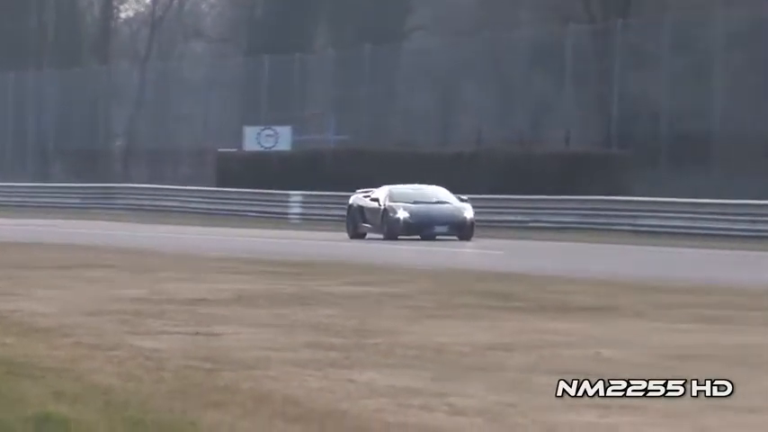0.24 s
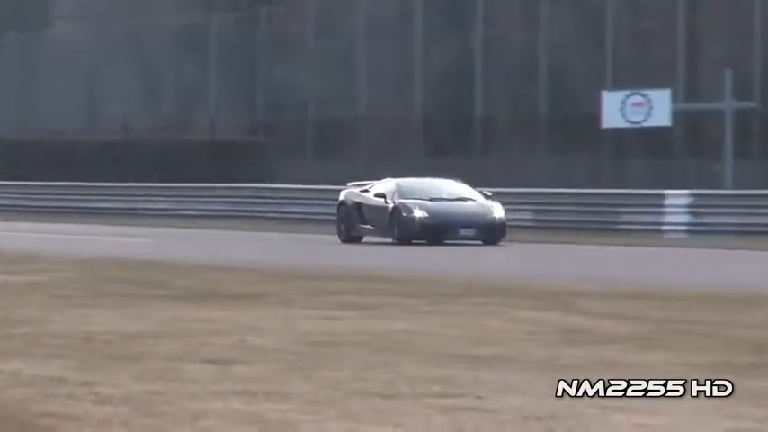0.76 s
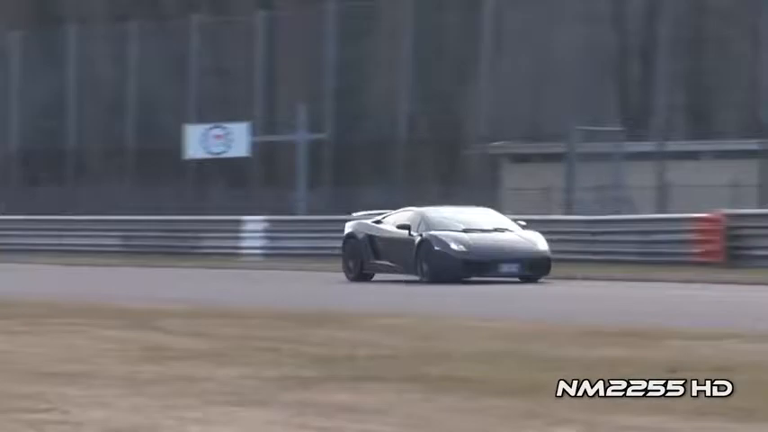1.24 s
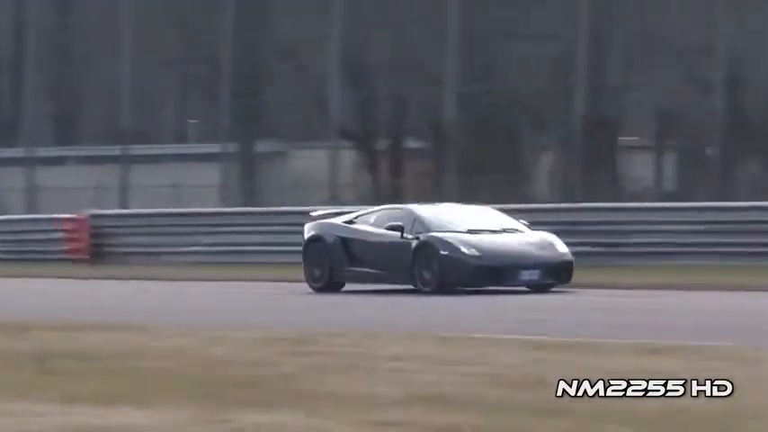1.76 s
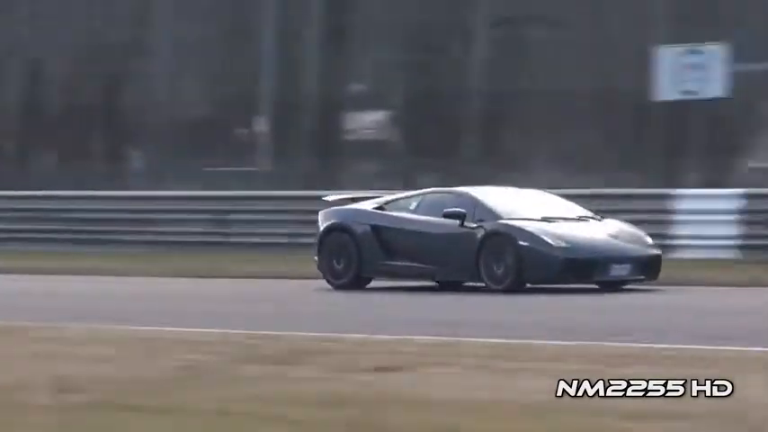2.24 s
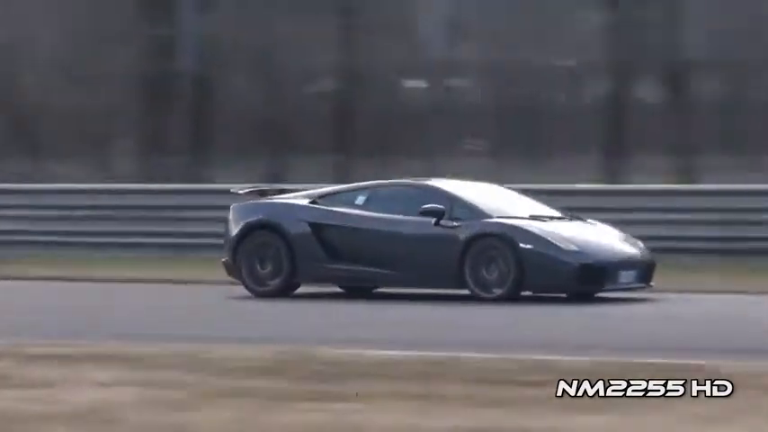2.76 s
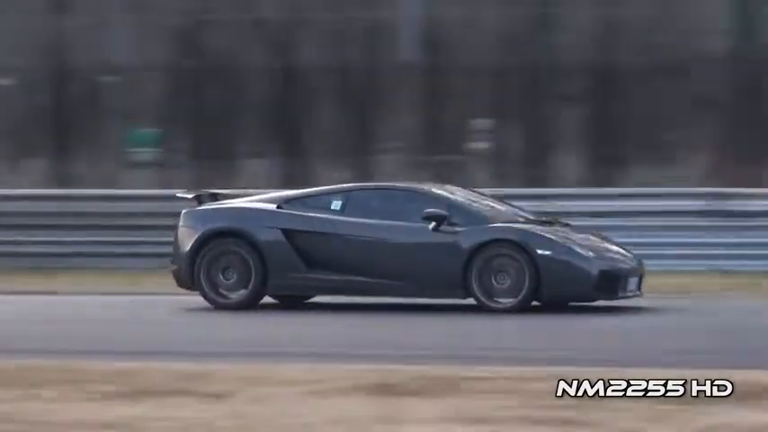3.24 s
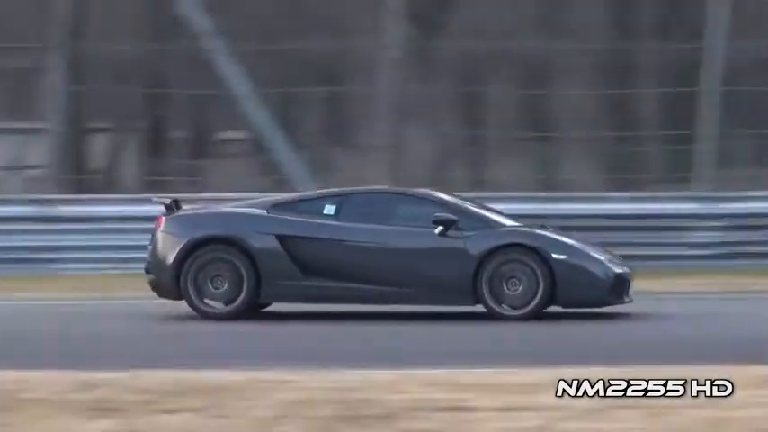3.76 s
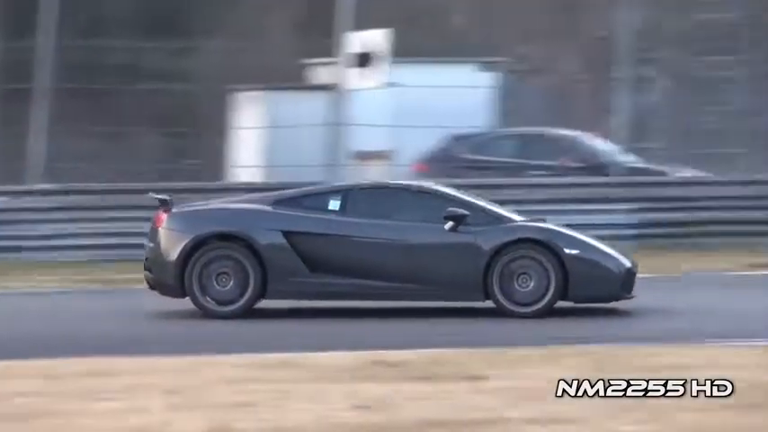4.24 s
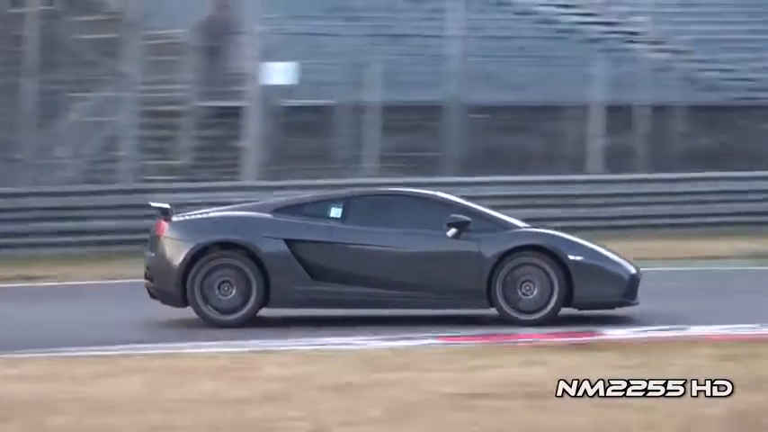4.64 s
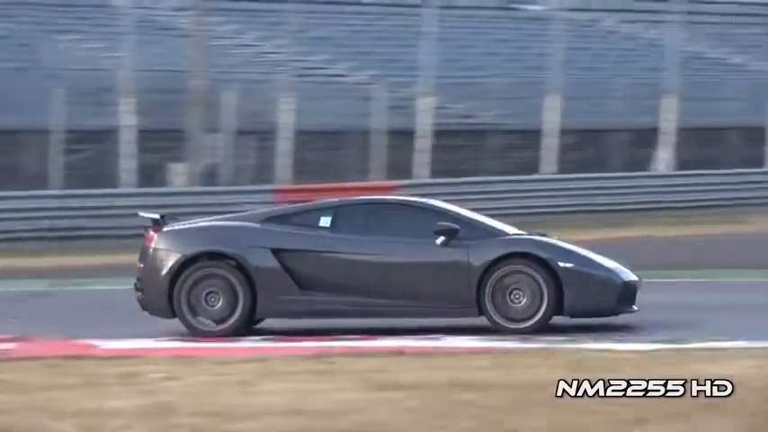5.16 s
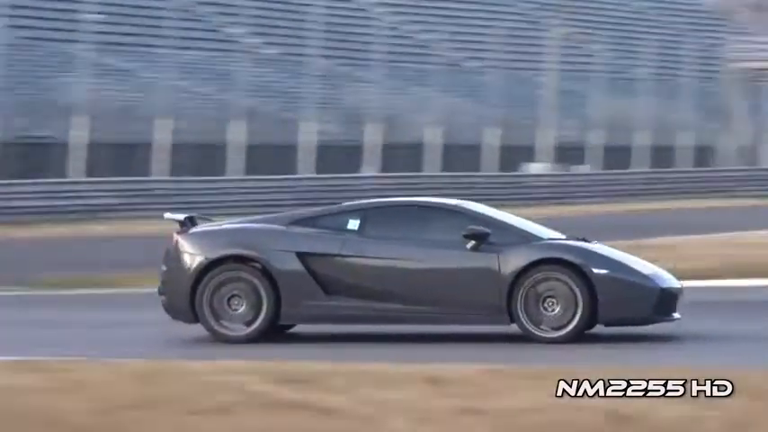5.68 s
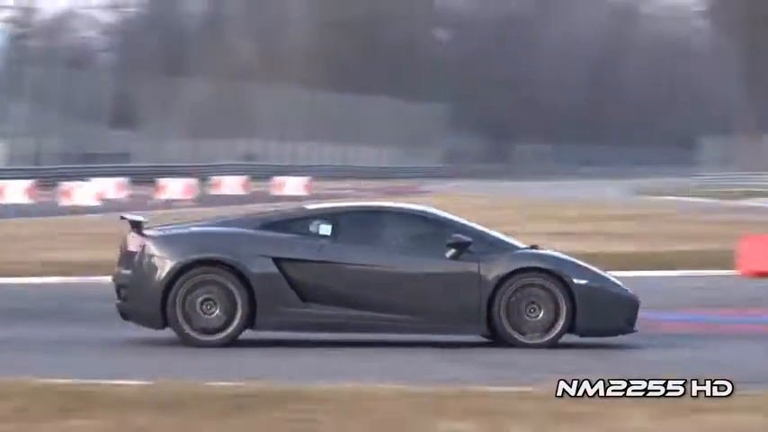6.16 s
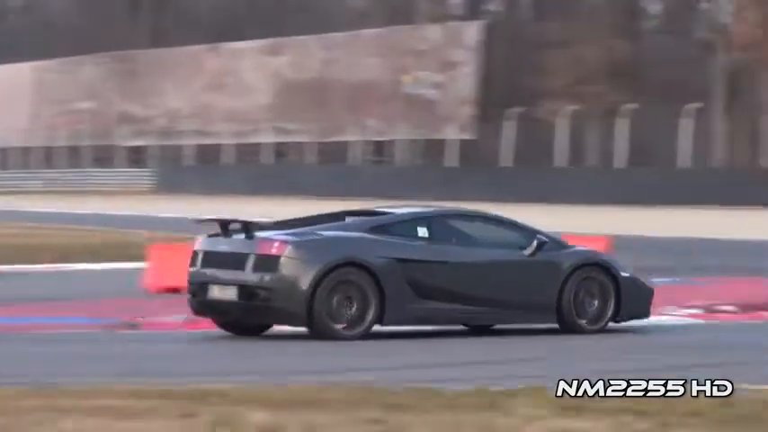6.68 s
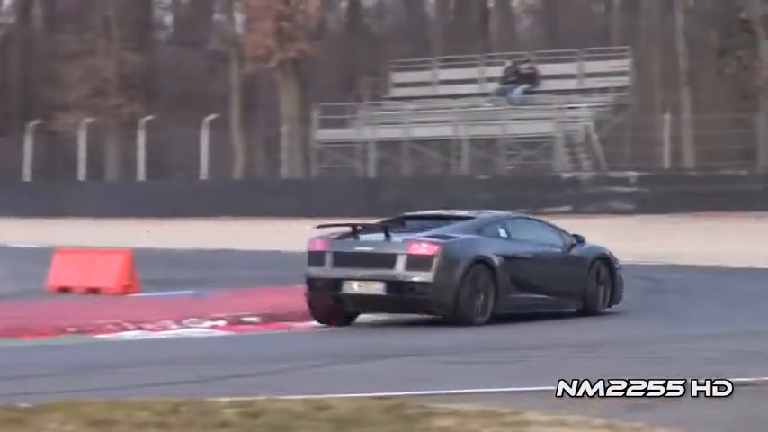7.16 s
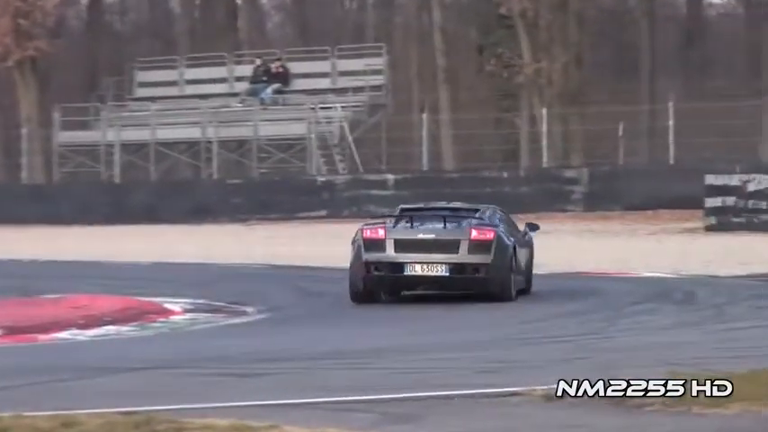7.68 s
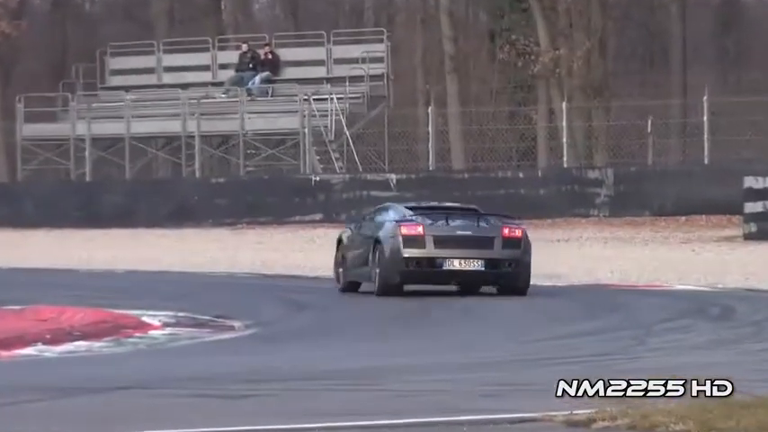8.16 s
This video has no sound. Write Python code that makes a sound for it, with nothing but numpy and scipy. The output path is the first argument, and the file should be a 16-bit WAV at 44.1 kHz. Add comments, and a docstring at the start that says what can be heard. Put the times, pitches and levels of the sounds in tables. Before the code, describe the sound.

A trackside microphone with muffled treble follows one powerful car braking for a chicane. Far-off whine and rushing roar come first, a throttle blip with a wall echo, a long fall in pitch, then a second, sharper crackling blip. The engine sinks to a hollow lumpy hum as it rolls by, with small pops, thumps and wind. After short tyre chirps, the throttle opens and the exhaust swells loudly.

```python
"""A falling engine note is heard first, under tyre and gas roar: a ten-cylinder sports car brakes for a
chicane with two throttle blips, rolls past, brushes the kerbs and opens the throttle on the way out.
The engine is a sum of orders (multiples of its cycle rate) weighted by resonant pipe modes; roar, rumble
and wind are noise with shaped spectra; cracks and chirps are ringing noise bursts; barriers reflect the car."""
import sys
import numpy as np
from scipy import signal
from scipy.fft import rfft, irfft, next_fast_len
from scipy.io import wavfile
from scipy.ndimage import uniform_filter1d

SR = 44100
rng = np.random.default_rng(int(sys.argv[2]) if len(sys.argv) > 2 else 0)


def to_wav(s):
    """Save 16-bit WAV."""
    ch = np.atleast_2d(s).T  # columns
    pcm = np.round(np.clip(ch, -1, 1) * 32767)  # PCM
    wavfile.write(sys.argv[1], SR, pcm.astype(np.int16))


N = 371322
T = np.arange(N) / SR
STEP = 32  # samples between control points
CONTROL_T = np.arange(N // STEP + 2) * STEP / SR

# Engine speed on the approach: (time [s], cycle rate [Hz])
APPROACH_SPEED = [(0, 61.26), (.25, 56.4), (.48, 53.87), (.53, 62.34), (.575, 70.5), (.625, 79), (.78, 69),
                  (.95, 62.95), (1.2, 60.7), (1.4, 57.03), (2.08, 47.01), (2.13, 49.45), (2.2, 61.7),
                  (2.24, 69.54), (2.275, 74.6), (2.36, 70.1), (2.5, 60.73)]
# Strongest tones on the approach: (time [s], order 5, one bank [dB], order 10, all cylinders [dB],
# order 7 [dB], order 8 [dB])
APPROACH_TONES = [(0, -63, -45, -64, -55), (.5, -63.5, -44.5, -57, -47.5), (1.3, -58, -53, -41, -41.5),
                  (1.55, -34.5, -42, -59.5, -49.5), (2.0, -36, -36.5, -62, -53), (2.11, -24, -32, -53, -39),
                  (2.2, -43, -47, -46, -42), (2.44, -38.5, -39, -40, -48)]
# Speed and tones past the second downshift: (time [s], cycle rate [Hz], orders 5, 10, 7, 8 [dB each])
CORNER = [(2.6, 59.2, -24, -31, -57, -53), (2.65, 57.84, -26, -36, -41, -49),
          (2.66, 57.25, -20, -52, -45.5, -48), (2.7, 56.33, -28, -34, -49, -59),
          (2.73, 55.34, -30, -28, -48, -44), (2.76, 54.86, -27, -33, -59, -44.5),
          (2.84, 53.33, -26.5, -27.5, -58.5, -51), (3.01, 50.9, -20.5, -27, -58, -58),
          (3.05, 49.38, -24, -25.5, -43, -57), (3.2, 47.33, -19.5, -24, -54, -53),
          (3.23, 46.73, -23.5, -26, -41, -56), (3.3, 45.2, -25.5, -24.5, -48, -46),
          (3.34, 44.63, -27, -23, -46.5, -37.5), (3.39, 44.34, -23.5, -28, -42, -57),
          (3.44, 43.2, -27, -33, -42.5, -39.5), (3.48, 42.98, -28.5, -41, -42, -56),
          (3.55, 42.13, -28, -36.5, -32.5, -61.5), (3.57, 42.02, -28.5, -36.5, -35, -36.5),
          (3.72, 39.8, -32.5, -38.5, -36, -58), (4.04, 37.32, -37, -40, -27, -41),
          (4.25, 35.13, -41, -36.5, -30, -38), (4.45, 33.5, -40, -34, -27, -25.5),
          (4.8, 32.3, -43, -37, -30, -22.5), (4.95, 31.34, -43, -31, -29, -20),
          (5.01, 32.06, -47, -25.5, -23.5, -25.5), (5.18, 31.04, -51, -31.5, -34, -20.5),
          (5.27, 31.2, -48, -40.5, -26.5, -27), (5.31, 31.24, -49, -34, -35, -22),
          (5.47, 30.78, -52, -30, -28, -20), (5.56, 31.45, -52, -24.5, -28, -15.5),
          (5.83, 32.2, -44, -17.5, -27.5, -16), (5.89, 32.87, -46.5, -17.5, -26, -16.5),
          (6.04, 32.26, -46.5, -25, -28.5, -15.5), (6.26, 32.54, -51, -32, -32, -19.5),
          (6.34, 32.38, -45, -29, -34, -33), (6.46, 31.36, -45, -31.5, -34, -24),
          (6.59, 32.3, -47.5, -26, -32, -29), (6.63, 32.31, -46, -30, -30, -17.5),
          (6.76, 31.2, -51, -23.5, -32, -18), (6.84, 31.42, -52, -26, -37, -17.5),
          (6.89, 31.18, -52, -28, -37, -22), (6.93, 31.38, -56, -21, -35, -24.5),
          (6.99, 31.4, -52, -34, -47, -19.5), (7.05, 31.24, -52, -24.5, -40, -28),
          (7.1, 31.3, -53, -27, -38, -27.5), (7.149, 31.4, -57, -40, -45, -23),
          (7.21, 31.18, -49, -35, -40, -29), (7.24, 31.13, -45, -35, -41.5, -42),
          (7.33, 30.64, -50, -44.5, -43, -36), (7.38, 30.76, -50, -37, -44.5, -37),
          (7.43, 30.7, -51, -30.5, -36.5, -31.5), (7.57, 30.53, -56.5, -34, -34, -29),
          (7.77, 30.52, -55, -24, -28, -24), (7.869, 31.67, -25, -17.5, -25.5, -21),
          (7.93, 32.32, -23.5, -14, -26.5, -30.5), (8.03, 32.3, -32, -12.5, -27.5, -27),
          (8.09, 32.5, -41, -11.5, -30.5, -58), (8.14, 33.75, -35.5, -12.5, -29, -30.5),
          (8.22, 35.48, -37, -12, -32, -23.5), (8.29, 34.84, -22, -14.5, -29, -30.5),
          (8.42, 35.17, -23, -18.5, -36, -24.5)]
ENGINE_SPEED = APPROACH_SPEED + [row[:2] for row in CORNER]
FIRING_TONES = APPROACH_TONES + [(s, *db) for s, _, *db in CORNER]
# Strongest overtones past the second downshift: (time [s], order 18 [dB], order 20 [dB], order 22 [dB])
OVERTONES = [(2.55, -41, -33, -42), (2.74, -42, -29.5, -44), (2.84, -33, -37, -41), (2.93, -28, -40, -36.5),
             (3.07, -20, -43.5, -37), (3.18, -28.5, -41.5, -44), (3.26, -44, -41, -42.5),
             (3.32, -45, -25.5, -44), (3.47, -40, -24.5, -31), (3.62, -37, -28, -44), (3.72, -42, -39, -40),
             (3.95, -43, -46, -35.5), (4.15, -42, -53, -35.5), (4.31, -46.5, -46, -50),
             (5.22, -51, -48.5, -49), (5.3, -52, -39, -50), (5.56, -49.5, -34.5, -46.5),
             (5.87, -49.5, -25.5, -49), (6.07, -48, -32, -47), (6.28, -45, -35, -47), (6.42, -54, -45, -53),
             (6.55, -44, -37, -48), (6.65, -41.5, -25.5, -41.5), (6.86, -49, -26.5, -34.5),
             (7.11, -48, -40, -32), (7.24, -40, -33, -45), (7.38, -39.5, -25, -36.5),
             (7.58, -45, -27.5, -36), (7.74, -51.5, -44.5, -36), (7.84, -48, -29.5, -35),
             (7.91, -28.5, -27, -45), (7.98, -33, -29, -47), (8.05, -27, -20, -47), (8.14, -35, -30.5, -46),
             (8.19, -40, -28, -39), (8.25, -27, -30, -38), (8.42, -46, -31, -46)]
# Orders that change with load: (order, relative level on light throttle [dB],
# change under braking [dB], change at full throttle [dB])
LOAD_ORDERS = [(3.92, 5, 0.8, 4), (6.1, -8.5, 8, 2), (9, -0.5, -1.5, -4), (13, -15, 6.5, 0),
               (14, -14, 7, 4), (15, 2.5, -1, -16), (17, 1.5, 1, 3), (18, 2.5, 6, 4), (19, -8.5, -6.5, 3.5),
               (20, 9.5, 0.6, -0.5), (24, -5.5, 3, 2), (30, -2.5, -1, -6)]
# Orders fed by unevenness between cylinders: (order, relative level [dB])
UNEVEN_ORDERS = [(2, -16.5), (3, -12.5), (11, 5), (12, 3.5), (16, -8.5), (21, -4), (22, -1), (23, -1),
                 (25, -2), (26, 0), (27, -5), (28, -3), (29, -1), (31, 0), (32, -9), (33, -3), (34, 0),
                 (35, -8), (36, -8), (37, -11), (38, -1), (39, -3), (40, -5), (41, -12), (42, -7), (43, -3),
                 (44, -9), (45, -7), (48, -8), (50, -5), (53, -6), (55, -1), (57, -2)]
# Growl at full throttle: (order, depth below the firing tone [dB])
GROWL = [(4, 27), (12, 22), (13, 25), (14, 28), (24, 20), (25, 21), (26, 30), (30, 27.5)]
# Order 12 standing out off the throttle: (time [s], level [dB])
OFF_THROTTLE_12 = [(0, -60), (7.0, -60), (7.2, -39), (7.8, -42), (8.42, -53.5)]
# Low line at a third of the firing tone, heard under braking: (time [s], level [dB])
UNDERTONE = [(0, -54), (2.2, -48), (2.32, -30.5), (2.44, -30.5), (2.55, -41.5), (3.3, -36.5), (3.45, -45),
             (3.6, -37.5), (3.83, -47.5), (3.97, -35.5), (4.1, -52.5), (4.38, -45), (4.55, -60),
             (8.42, -61.5)]
# Lumpiness of combustion: (time [s], factor on the wavering of every order)
LUMPY = [(0, 1), (4.9, 1), (5.05, 1.5), (5.3, .7), (7.0, .7), (7.15, 1.3), (7.7, 1.1), (7.85, .7),
         (8.42, .7)]
# Brief dips in the level of the engine orders: (time [s], depth [dB], half length [s])
DIPS = [(5.065, 10, .024), (5.113, 5, .012), (5.262, 7, .03), (6.36, 6, .03), (6.57, 3, .03)]
# Pipe mode weights as the tail turns: (time [s], low [dB], middle [dB], high [dB], top [dB])
MODE_LEVELS = [(0, -64, -43.5, -36, -45.5), (.4, -58, -41, -27.5, -41), (.68, -69, -37, -41, -31),
               (.9, -32.5, -37, -14.5, -52), (1.03, -43, -35, -30, -51), (1.36, -50.5, -32.5, -38, -55),
               (1.6, -37.5, -33, -23, -35.5), (2.01, -34, -43, -43, -43), (2.12, -18, -49, -32, -29),
               (2.22, -45, -44, -41, -19.5), (2.3, -35, -35, -44, -32.5), (2.45, -30.5, -25, -44, -28.5),
               (2.53, -12, -27, -18, -33), (2.66, -14.5, -24, -34, -31.5), (2.71, -30, -28.5, -20, -28.5),
               (3.05, -23, -18, -14, -25.5), (3.8, -21.5, -26.5, -23, -30), (4.15, -21, -32.5, -23.5, -36),
               (4.5, -27, -40, -43.5, -40), (4.95, -21, -49, -29.5, -44), (5.2, -19, -43, -29, -43.5),
               (5.4, -20, -30.5, -29.5, -41.5), (5.65, -14.5, -31.5, -24.5, -35.5),
               (5.9, -10.5, -28, -22.5, -34.5), (6.2, -21, -20, -27.5, -37), (6.47, -20, -38, -55, -50.5),
               (6.68, -21, -17.5, -24.5, -38.5), (6.9, -16.5, -24, -29, -39),
               (7.04, -24, -27.5, -33.5, -34.5), (7.2, -25, -27.5, -22, -42), (7.3, -34, -25, -27, -42),
               (7.42, -21.5, -18, -22.5, -40), (7.52, -24.5, -21, -15.5, -32), (7.62, -26, -22, -19.5, -44),
               (7.74, -26.5, -36.5, -21.5, -31.5), (7.84, -13.5, -23, -22, -31.5),
               (7.93, -10.5, -19.5, -14, -29), (8.04, -11, -15, -17, -37.5), (8.14, -18, -28, -27, -31),
               (8.22, -16, -16, -20.5, -24.5), (8.42, -16, -35.5, -16.5, -28.5)]
# Fixed mode settings: low (frequency [Hz], width [Hz]), high width [Hz], top (frequency [Hz], width [Hz])
FIXED_MODES = [(251, 75), 48, (1590, 1070)]
# Modes that shift as the tail turns: (time [s], middle [Hz], middle width [Hz], high [Hz])
MOVING_MODES = [(0, 682, 84.5, 885), (5.2, 664, 83, 871), (5.9, 648.6, 89.78, 900.5),
                (6.65, 621.7, 70.67, 941), (6.85, 659.5, 89.9, 925.7), (7.05, 686, 89.5, 905),
                (7.2, 620, 119.7, 923), (7.45, 617, 119, 850), (7.65, 683.6, 108.9, 854.4),
                (7.85, 641.4, 80.2, 844.8), (8.1, 640.2, 79.97, 870), (8.42, 685, 83, 871.3)]
# Narrow modes, one list following the high mode, one the top: (frequency [Hz], width [Hz], relative level [dB])
SIDE_MODES = [
    [(491, 27, -11)],
    [(1295, 22, 2.5), (1496, 30, 5), (1620, 29, -4), (1975, 110, 3), (2135, 80, 2.5)],
]
# Downshift blips: (peak time [s], howl level [dB], howl rise [s], wall echo [dB], overtone change [dB],
# roar lag [s], extra roar [dB], extra rasp [dB])
BLIPS = [(.6, -24, .08, -1, -11, .09, 2, 11), (2.24, -14, .06, -18, 0, .08, 4, 6)]
# Partials of the howl: (order, relative level [dB], lateness of the peak [s])
HOWL_PARTIALS = [(10, -4, 0), (18, -4, .022), (20, 0, -.015), (28, -5, .017), (30, -3, -.017)]
# Exhaust cracks and kerb chirps: (start [s], crest level [dB], centre [Hz], width [Hz], length [s])
KNOCKS = [(2.1, -22, 950, 110, .038), (2.1, -25, 460, 120, .04), (2.135, -24, 1400, 700, .025),
          (4.945, -27, 1050, 120, .045), (4.97, -22, 1180, 250, .045), (4.985, -22, 225, 40, .07),
          (7.126, -22, 2200, 600, .026), (7.182, -18, 2200, 900, .03), (7.19, -27, 1200, 300, .02),
          (7.226, -21, 2400, 800, .034), (7.35, -34, 1880, 200, .07), (7.3, -29, 880, 70, .05),
          (7.46, -31, 825, 40, .05), (7.495, -23, 872, 35, .07), (7.86, -25, 825, 25, .07),
          (7.9, -20, 855, 20, .11)]
# Position of the car: (time [s], echo level [dB], left-right difference [dB],
# ground-echo notch [Hz], notch depth [dB])
PLACE = [(0, -18.5, -1, 329, 30), (1.9, -23, 0.5, 335, 26), (2.8, -13.5, 0, 387, 14),
         (4.2, -23.5, -0.5, 484.2, 9.5), (5.5, -20, -.7, 438.5, 8), (6.9, -16, -.9, 451.6, 7),
         (7.25, -13, -2, 436.4, 1), (7.7, -18.5, -1.7, 442, 10.5), (8.42, -12.5, -0.9, 429, 8.5)]
# Loudness of the roar: (time [s], relative level [dB])
ROAR = [(0, -27.5), (.35, -29.5), (.6, -21.5), (1.9, -23.5), (2.07, -24.5), (2.25, -18.5), (3.2, -19.5),
        (3.7, -21.5), (4.25, -24), (4.9, -28.5), (5.1, -29), (5.46, -27), (5.65, -23.5), (5.9, -19.5),
        (6.02, -26), (6.25, -27), (6.45, -27.5), (6.78, -24), (7.7, -23), (7.88, -20.5), (8.23, -14),
        (8.42, -17.5)]
# Spectrum of the roar: (frequency [Hz], relative density [dB])
ROAR_COLOUR = [(80, -36.5), (150, -11), (400, 1), (520, 0), (750, -2.5), (1010, 0.5), (1500, -4),
               (2000, -5), (2700, -3), (3300, -8.5), (5000, -13), (8000, -12.5), (15000, -9)]
# Treble of the roar: (time [s], rasp [relative dB], hiss [relative dB])
TREBLE = [(0, -20, -30), (.7, -21.5, -48), (1.9, -15.5, -35.5), (2.5, -12, -35), (3.3, -10.5, -34.5),
          (4.2, -9.5, -30.5), (5.0, -5.5, -26.5), (5.5, -9.5, -28.5), (5.7, -4, -39), (5.9, -3, -39),
          (6.3, -3, -23.5), (7.2, -6.5, -32.5), (7.83, -12.5, -36), (8.42, -10.5, -38.5)]
# Left-right coherence of the roar: (frequency [Hz], coherence)
COHERENCE = [(60, 0.94), (130, 0.96), (270, 0.97), (580, 0.85), (1220, 0.94), (2600, 0.93)]
# Spectrum of the rumble: (frequency [Hz], relative density [dB])
RUMBLE_COLOUR = [(20, -28.5), (35, 4.5), (60, -21), (120, 4), (200, 4), (320, -21.5), (600, -56)]
# Low thumps: (time [s], height above the rumble [dB], half length [s])
THUMPS = [(0.476, 17.5, 0.023), (.64, 7, 0.033), (0.862, 18.5, 0.099), (2.096, 22, 0.033),
          (2.458, 14.5, 0.045), (2.62, 20, 0.15), (4.299, 12, 0.12), (5.141, 12.5, 0.094),
          (7.133, 17, 0.24), (7.869, 2.5, 0.053), (8.22, 22, .12)]
# Gusts on the microphone: (time [s], height above the wind [dB])
GUSTS = [(.89, 9), (5.11, 25), (5.63, 15), (6.21, 12), (8.42, 5)]
# Microphone response: (frequency [Hz], gain [dB])
MICROPHONE = [(20, 4), (1800, -3.5), (2800, -14), (4000, -16.5), (5500, -23.5), (7000, -33), (9000, -47),
              (11000, -64.5), (16000, -59.5)]
# Thin steady whine: (frequency [Hz], level [dB])
WHINE = [(7101, -88.5), (7149, -86)]

FULL_FROM_S, FULL_RISE_S = 7.74, 0.075  # the throttle opens fully
BRAKE_UNTIL_S, BRAKE_FADE_S = 4.9, 0.45  # braking has faded out by the first time
PIPED_LOW_HZ, PIPED_HIGH_HZ = 190, 1120  # the load orders fade outside this band
BANK_THIRD_DB = -2.5  # order 15 relative to the bank tone at full throttle
HOWL_FALL_S, HOWL_TOP_HZ = 0.047, 2200  # the pipes suppress howl above this frequency
HOWL_ROUGH = .3  # fast flutter, growing with order above the firing tone
SLAP_S = .125  # delay of the far wall
CLEAR_HZ = 50  # bursts narrower than this ring as a clear note
BLIP_ROAR_S, GUST_S = (0.15, 0.14), (0.26, .15)  # (rise, fall)
RUMBLE_DB, WIND_DB = -51.5, -62.5  # relative levels
EDGE_HZ = 15300  # upper band limit


def exhaust(cycles):
    """Additive synthesis: one tone per order, with amplitude and phase wavering from uneven combustion."""
    levels = order_levels(CONTROL_T)
    swing = drift(count=len(levels), seconds=.06)
    slip = drift(count=len(levels), seconds=.06)
    lumpy = play(LUMPY, CONTROL_T)[0]
    out = np.zeros(N)
    for (order, level), swell, wander, start in zip(levels, swing, slip, rng.random(len(levels))):
        rough = (.08 + .006 * order) * lumpy
        # one strong pulse a cycle rings the middle mode, so its orders throb together
        start *= .09 if 16 < order < 24 else 1
        turn = order * cycles + start + np.interp(T, CONTROL_T, 0.09 * rough * wander)
        amplitude = np.interp(T, CONTROL_T, level * (1 + rough * swell))
        out += amplitude * np.sqrt(2) * np.cos(2 * np.pi * turn)
    return out


def crank():
    """Phase is the integral of frequency: engine cycles elapsed, with small speed flutter."""
    flutter = 1 + .0018 * drift(count=1, seconds=.03)[0]
    rate = play(ENGINE_SPEED, CONTROL_T)[0] * flutter
    return np.cumsum(np.interp(T, CONTROL_T, rate)) / SR


def order_levels(t):
    """Source-filter principle: combustion orders weighted by pipe resonance, throttle load and dips."""
    hz = play(ENGINE_SPEED, t)[0]
    bank_db, firing_db, seven_db, eight_db = play(FIRING_TONES, t)
    full = np.clip((t - FULL_FROM_S) / FULL_RISE_S, 0, 1)
    braking = np.clip((BRAKE_UNTIL_S - t) / BRAKE_FADE_S, 0, 1)

    def outside_db(f):
        return 10 * np.log10((1 + (PIPED_LOW_HZ / f) ** 33.0) * (1 + (f / PIPED_HIGH_HZ) ** 1.7))

    rows = [(k, db + braking * brake_db + full * full_db - outside_db(k * hz))
            for k, db, brake_db, full_db in LOAD_ORDERS]
    rows += UNEVEN_ORDERS
    power = {round(k): gain_of(db - 9.0) ** 2 * pipe_power(round(k) * hz, t) for k, db in rows}
    # tones with their own level curves replace the filtered ones
    power.update(zip((5, 10, 7, 8), gain_of([bank_db, firing_db, seven_db, eight_db]) ** 2))
    for k, db in zip((18, 20, 22), play(OVERTONES, t)):
        power[k] = np.where(t < OVERTONES[0][0], power[k], gain_of(db) ** 2)
    power[15] = power[15] + (full * gain_of(bank_db + BANK_THIRD_DB)) ** 2
    for k, below_db in GROWL:
        power[k] = power[k] + (full * gain_of(firing_db - below_db)) ** 2
    power[12] = power[12] + gain_of(play(OFF_THROTTLE_12, t)[0]) ** 2
    power[10 / 3] = gain_of(play(UNDERTONE, t)[0]) ** 2
    dips = gain_of(-sum(db * hump(t, s, (w, w)) for s, db, w in DIPS))
    return [(k, np.sqrt(p) * dips) for k, p in power.items()]


def pipe_power(hz, t):
    """Resonance: each pipe mode passes power near its frequency, and the powers of the modes add."""
    mode_levels = play(MODE_LEVELS, t)
    power = 0
    for main_db, modes in zip(mode_levels[-2:], SIDE_MODES):
        for f, width, db in modes:
            power = power + gain_of(main_db + db) ** 2 / (1 + (2 * (hz - f) / width) ** 4)
    middle_hz, middle_width, high_hz = play(MOVING_MODES, t)
    low, high_width, top = FIXED_MODES
    modes = (low, (middle_hz, middle_width), (high_hz, high_width), top)
    for db, (f, width) in zip(mode_levels, modes):
        off = 2 * (hz - f) / width
        # a main peak plus a weak one with steeper sides
        peak = 1 / (1 + off ** 4) + gain_of(-13.0) ** 2 / (1 + (off / 0.94) ** 6)
        power = power + gain_of(db) ** 2 * peak
    return power


def howl(cycles):
    """Additive partials: the firing tone, its overtones and two nearby orders swell and fade with each blip,
    and a far wall reflects it once."""
    out, hz = np.zeros(N), play(ENGINE_SPEED, CONTROL_T)[0]
    for s, db, rise, echo_db, over_db, *_ in BLIPS:
        cry = np.zeros(N)
        flutters = drift(count=len(HOWL_PARTIALS), seconds=.004)
        for (k, order_db, late), flutter in zip(HOWL_PARTIALS, flutters):
            sides = np.multiply((rise, HOWL_FALL_S), 1 if k == 10 else .45)  # overtones are briefer
            level = gain_of(db + order_db + over_db * (k > 10)) * hump(CONTROL_T, s + late, sides)
            level /= 1 + (k * hz / HOWL_TOP_HZ) ** 16
            level *= 1 + (k / 10 - 1) * HOWL_ROUGH * flutter
            tone = np.sqrt(2) * np.cos(2 * np.pi * (k * cycles + rng.random()))
            cry += np.interp(T, CONTROL_T, level) * tone
        out += cry + gain_of(echo_db) * np.roll(cry, round(SLAP_S * SR))
    return out


def knocks():
    """Damped resonance: noise ringing in a band, quick to rise and slower to fall."""
    out, t = np.zeros(N), T[:SR // 8]
    for s, db, hz, width, length in KNOCKS:
        pole = np.exp(-np.pi * width / SR)
        ring = rng.standard_normal((2, len(t)))
        for _ in range(2):
            ring = signal.lfilter([1], [1, -pole], ring)
        # a constant part adds a clear note to narrow bands
        ring = evened(ring) + [[2 * (CLEAR_HZ / width) ** 2], [0]]
        turn = 2 * np.pi * hz * t
        band = evened(ring[0] * np.cos(turn) + ring[1] * np.sin(turn))
        shape = np.sin(np.pi * np.clip(t / length, 0, 1) ** .7) ** 2
        out[round(s * SR):][:len(t)] += gain_of(db) * band * shape
    return out


def barriers(x):
    """Multiple reflection: sparse decaying echoes from rails and fences, different in each channel."""
    size = SR // 2
    taps = np.zeros((2, size))
    # one echo in every 40 samples, at a random place and of random sign
    at = np.arange(200, size - 40, 40) + rng.integers(0, 40, (2, (size - 201) // 40))
    np.put_along_axis(taps, at, rng.choice([-1., 1.], at.shape), 1)
    taps *= gain_of(-60 * T[:size] / .45)  # 60 dB of decay in 0.45 s
    return signal.fftconvolve(x[None], taps / np.linalg.norm(taps[0]), axes=1)[:, :N]


def roar(cycles):
    """Interference and modulation: tyre and gas noise notched by the ground echo, puffed by the firing."""
    def level_db(hz, t):
        db = play(ROAR, t)[0]
        rasp_db, hiss_db = play(TREBLE, t)
        for s, *_, lag, loud_db, bright_db in BLIPS:
            blip = hump(t, s + lag, BLIP_ROAR_S, flat=2.6)
            db = db + blip * loud_db
            rasp_db = rasp_db + blip * bright_db
            hiss_db = hiss_db + 0.67 * blip * bright_db
        *_, notch_hz, depth_db = play(PLACE, t)
        octave = np.log2(hz + 1)
        # rasp tilts the octave from 2.1 kHz, hiss the octave from 4.2 kHz
        tilt = np.clip(octave - 11.05, 0, 1) * (rasp_db + 11.0)
        tilt = tilt + np.clip(octave - 12.05, 0, 1) * (hiss_db - rasp_db + 20.0)
        notch = depth_db * np.exp(-((octave - np.log2(notch_hz)) / 0.37) ** 2)
        wide = gain_of(db + read(ROAR_COLOUR, hz) + tilt - notch + 10.5) ** 2
        # gas noise in the pipes
        in_pipe = pipe_power(hz, t) * gain_of(-17) ** 2 * np.clip(hz / 900, 0, 1) ** 2 * (hz < 1050)
        return 10 * np.log10(wide + in_pipe + 1e-16)

    puffs = 1 + sum(depth * np.cos(2 * np.pi * k * cycles) for k, depth in [(1, 0.068), (2, 0.064), (5, 0.08)])
    return puffs * noise(size=512, level_db=level_db, patchy_db=1.0, same=lambda hz: read(COHERENCE, hz))


def rumble():
    """Coherence: tyre and body rumble is alike in both channels, wind turbulence only partly so."""
    def road_db(hz, t):
        thumps = sum(db * hump(t, s, (w, w)) for s, db, w in THUMPS)
        return RUMBLE_DB + thumps + read(RUMBLE_COLOUR, hz) + 15.5

    def wind_db(hz, t):
        gusts = sum(db * hump(t, s, GUST_S) for s, db in GUSTS)
        return WIND_DB + gusts + 19.5 - 28.0 * np.log2((hz + 1) / 47.0) ** 2

    road = noise(size=2048, level_db=road_db, patchy_db=4.0, same=lambda hz: 1.0 + 0 * hz)
    wind = noise(size=2048, level_db=wind_db, patchy_db=3, same=lambda hz: .7 + 0 * hz)
    return road + wind


def noise(size, level_db, patchy_db, same):
    """Spectral shaping: stereo noise from random short-time spectra weighted by level_db(hz, t)."""
    hop = size // 4
    hz, t = np.fft.rfftfreq(size, 1 / SR)[:, None], np.arange(N // hop + 5) * hop / SR
    a, b, c, d, patches = rng.standard_normal((len(t), len(hz), 5)).T
    for axis in (0, 1):
        patches = uniform_filter1d(patches, size=9, axis=axis)
    same = np.clip(same(hz), -1, 1)
    left, other = a + 1j * b, c + 1j * d
    spectra = np.array([left, same * left + np.sqrt(1 - same ** 2) * other])
    spectra *= gain_of(level_db(hz, t) + patchy_db * evened(patches))
    return signal.istft(spectra, nperseg=size, noverlap=size - hop)[1][:, :N] / np.sqrt(size / 2)


def drift(count, seconds):
    """Low-pass filtering of noise: twice-averaged random wander at control rate, rms 1."""
    size = max(int(seconds * SR / STEP), 1)
    x = rng.standard_normal((count, N // STEP + 2))
    for _ in range(2):
        x = uniform_filter1d(x, size, axis=1)
    return evened(x)


def hump(t, s, sides, flat=2):
    """Bell envelope of height 1 at time s; sides = (rise [s], fall [s]); a larger flat squares it off."""
    return np.exp(-abs((t - s) / np.where(t < s, *sides)) ** flat)


def play(rows, t):
    """Linear interpolation in time: every column of a curve table at times t."""
    s, *columns = np.transpose(rows)
    return [np.interp(t, s, c) for c in columns]


def read(points, hz):
    """Interpolation on a logarithmic frequency axis: a spectrum table at hz."""
    f, value = np.transpose(points)
    return np.interp(np.log(hz + 1), np.log(f + 1), value)


def gain_of(db):
    """Decibel law: level to amplitude ratio."""
    return 10 ** (np.asarray(db) / 20)


def evened(x):
    """Normalization of mean power: scales to rms 1."""
    return x / np.sqrt(np.mean(abs(x) ** 2) + 1e-20)


def scene():
    """Superposition: the panned car, its reflections, roar and rumble add."""
    cycles = crank()
    echo_db, pan_db, *_ = play(PLACE, T)
    car = exhaust(cycles) + howl(cycles) + knocks()
    direct = car * gain_of([pan_db / 2, -pan_db / 2])
    echoes = gain_of(echo_db) * barriers(car)
    return direct + echoes + roar(cycles) + rumble()


def record(dry):
    """Linear filtering: a dull microphone response, an added thin whine, then a low-pass band limit."""
    size = next_fast_len(N + 4096)
    response = gain_of(read(MICROPHONE, np.fft.rfftfreq(size, 1 / SR)))
    heard = irfft(rfft(dry, size) * response, size)[:, :N]
    whine = sum(gain_of(db) * np.sqrt(2) * np.sin(2 * np.pi * hz * T) for hz, db in WHINE)
    low_pass = signal.firwin(511, EDGE_HZ, window=("kaiser", 9), fs=SR)
    return signal.oaconvolve(heard + whine, low_pass[None], "same")


dry = scene()
out = record(dry)
to_wav(out)
```